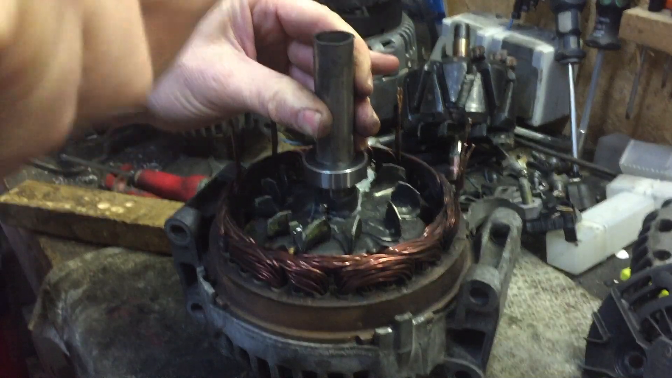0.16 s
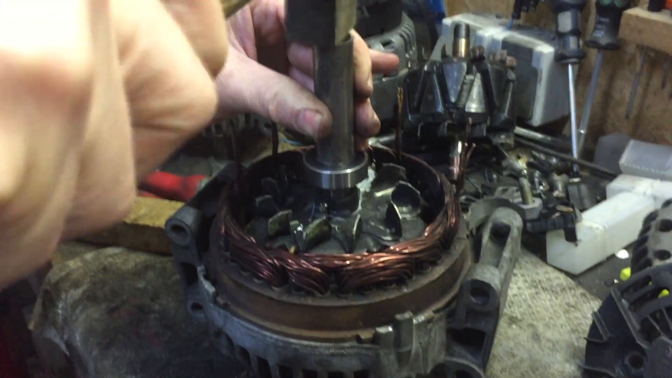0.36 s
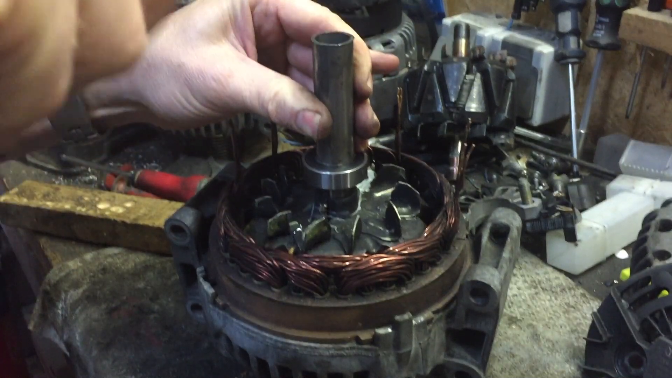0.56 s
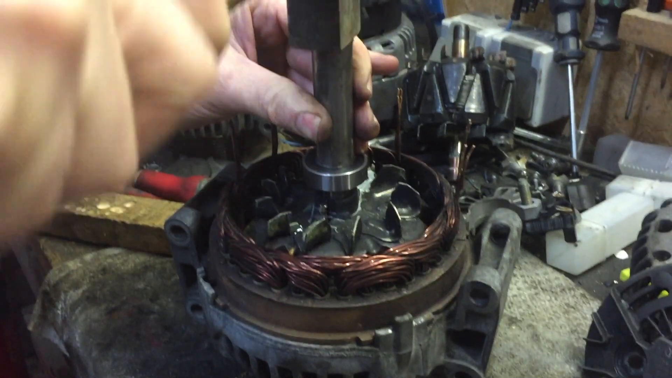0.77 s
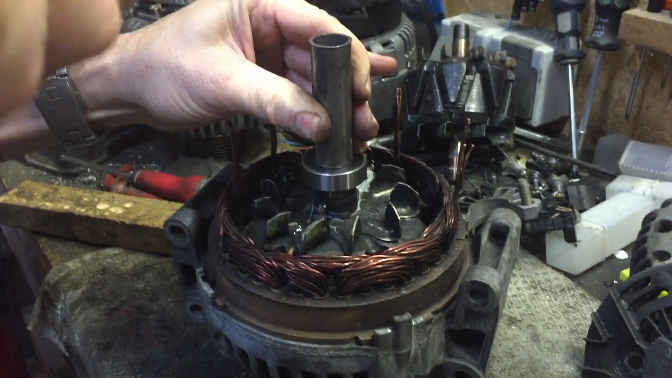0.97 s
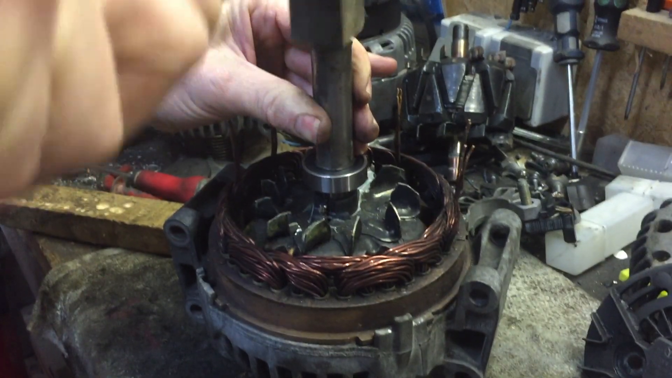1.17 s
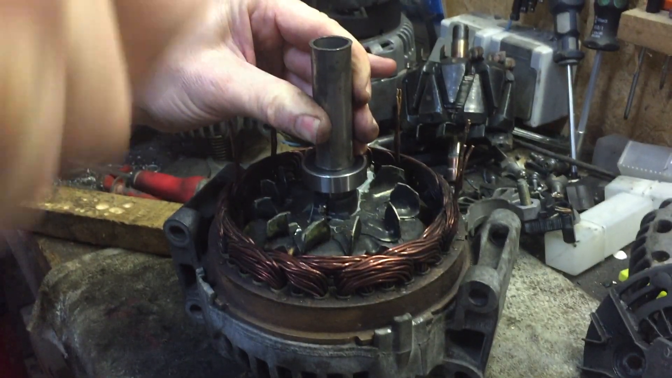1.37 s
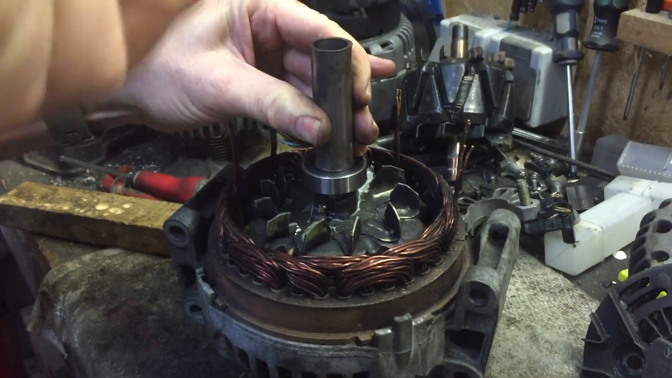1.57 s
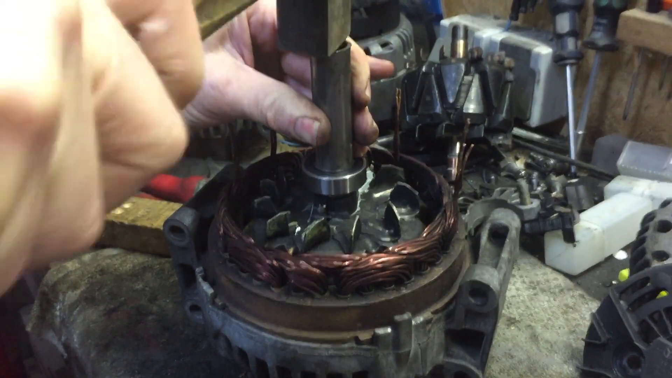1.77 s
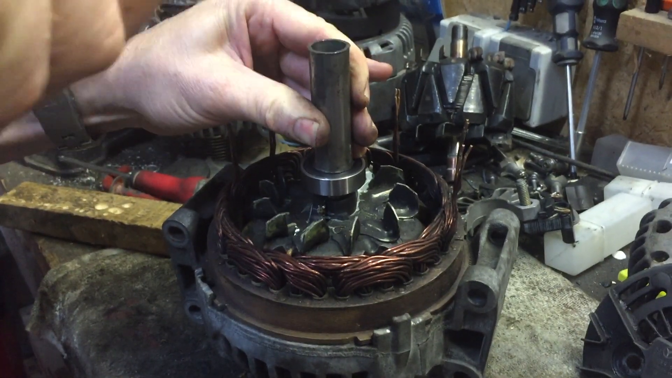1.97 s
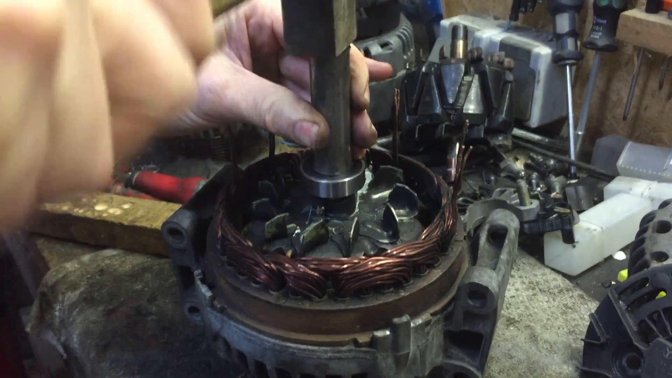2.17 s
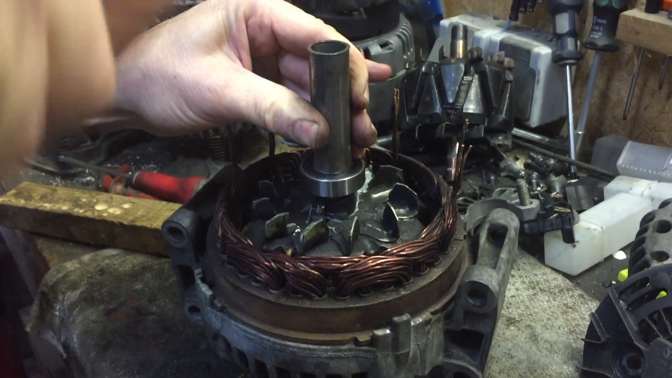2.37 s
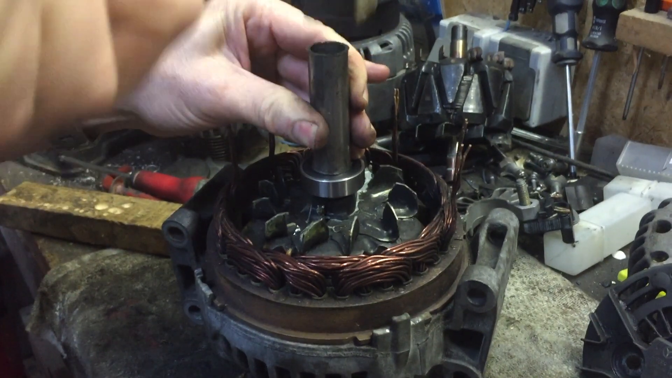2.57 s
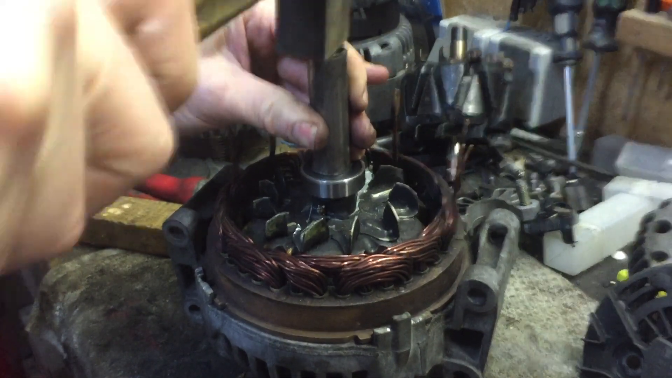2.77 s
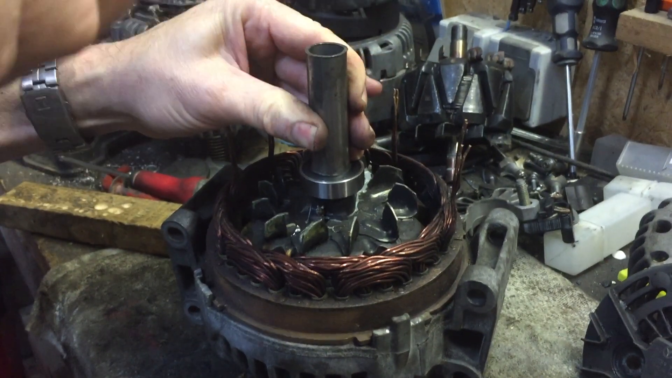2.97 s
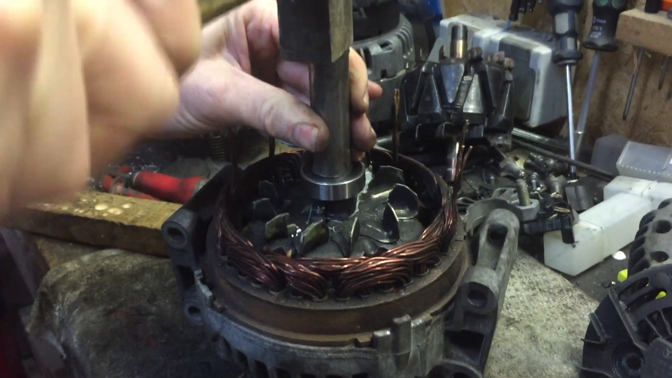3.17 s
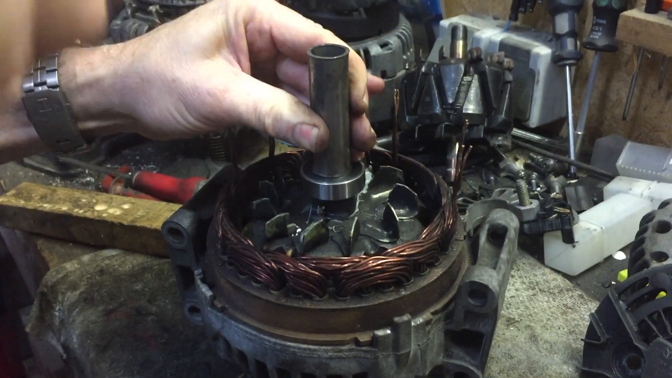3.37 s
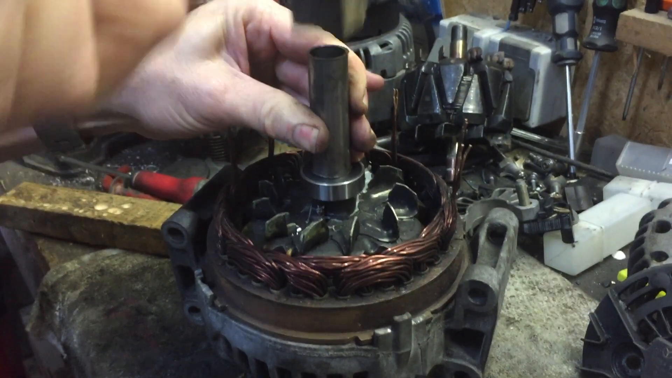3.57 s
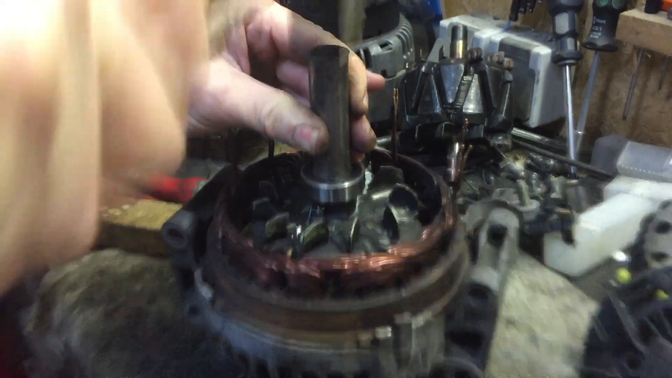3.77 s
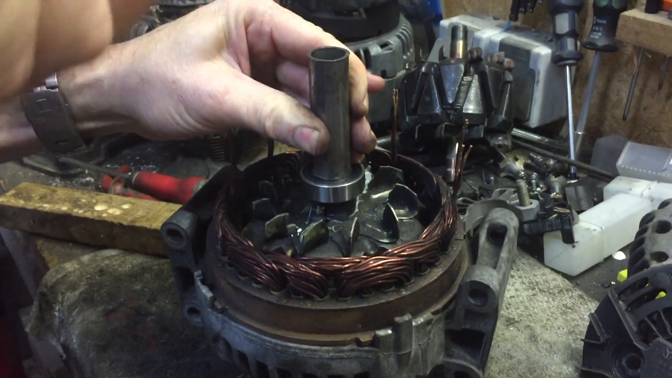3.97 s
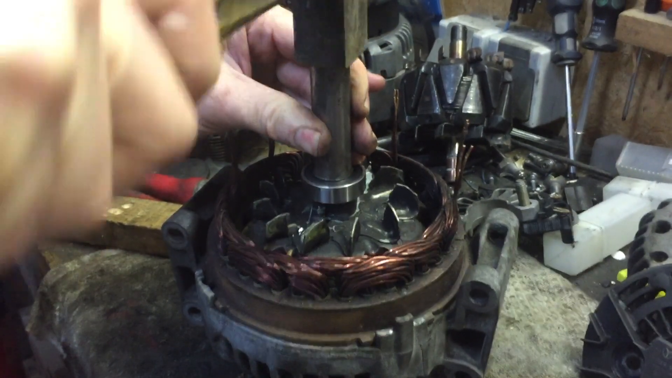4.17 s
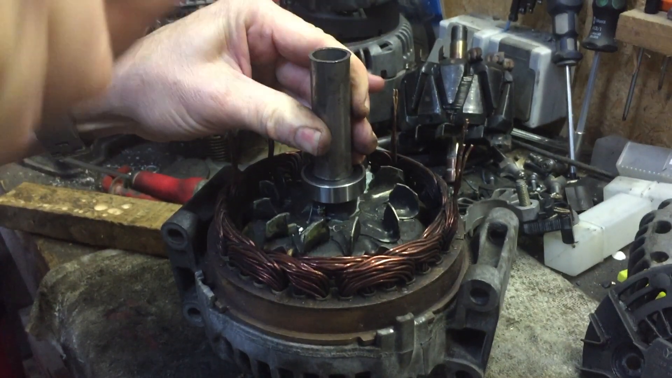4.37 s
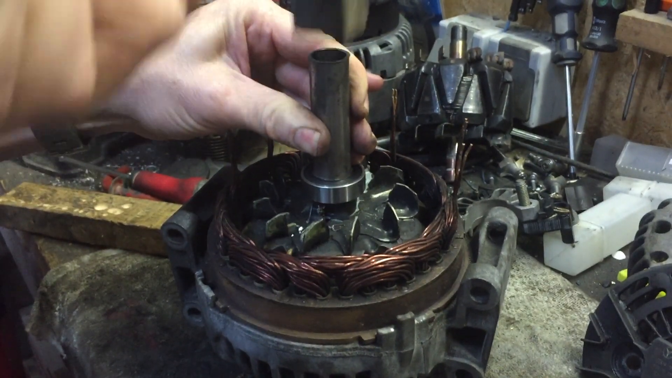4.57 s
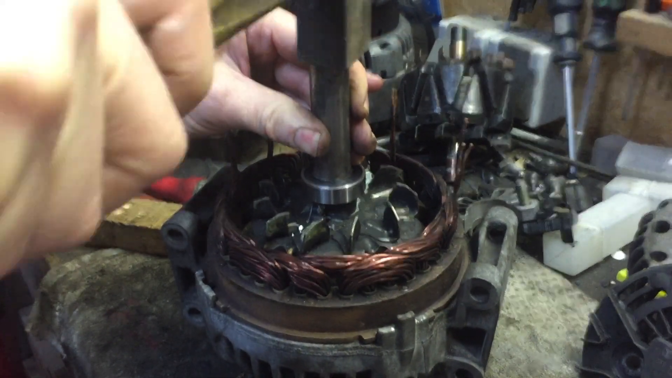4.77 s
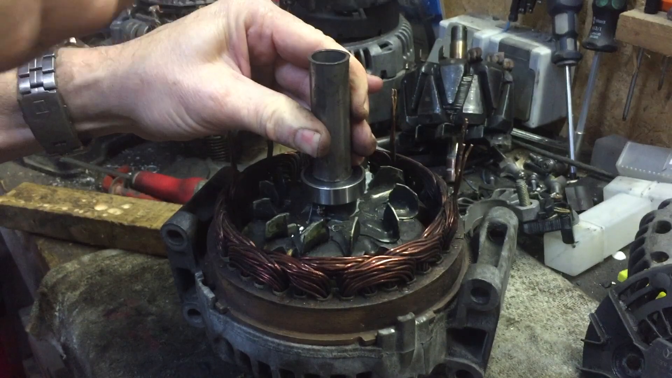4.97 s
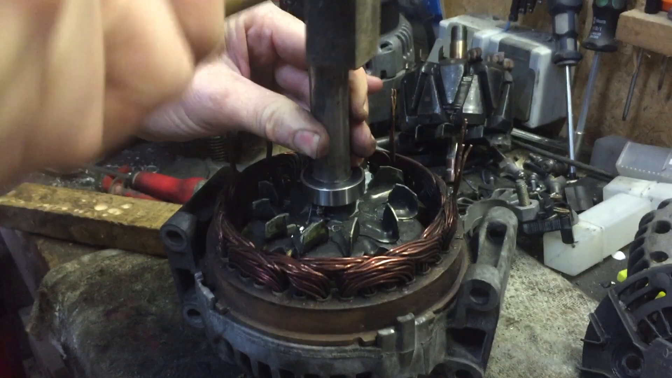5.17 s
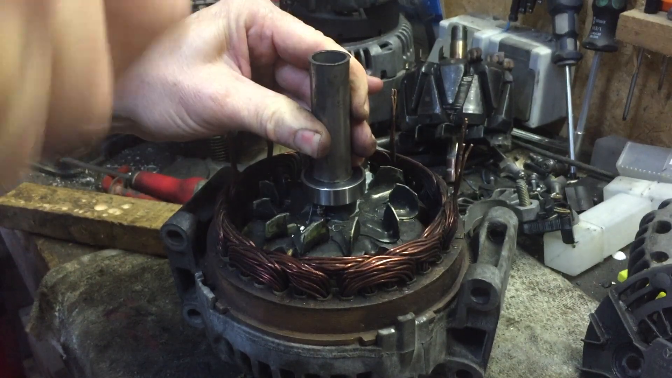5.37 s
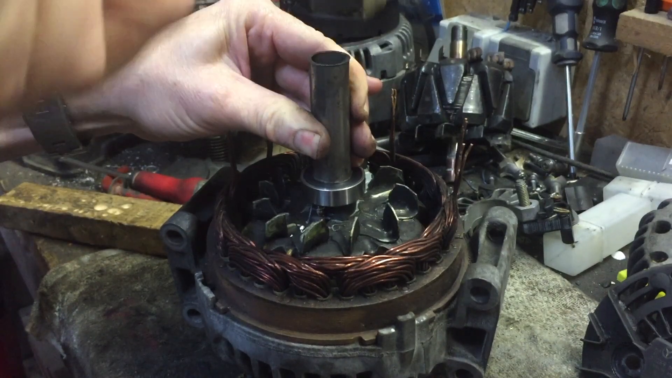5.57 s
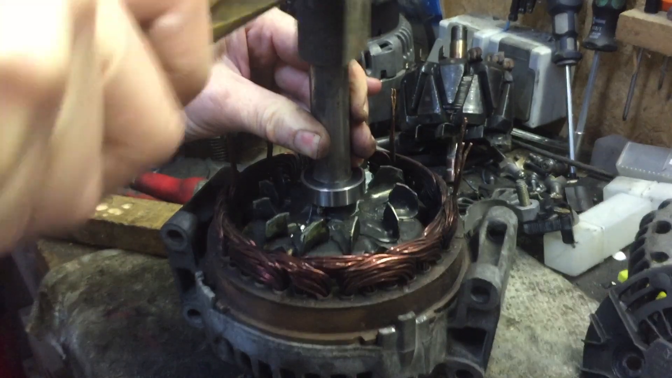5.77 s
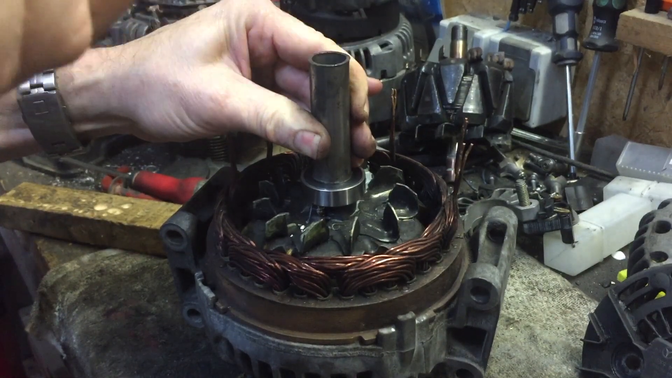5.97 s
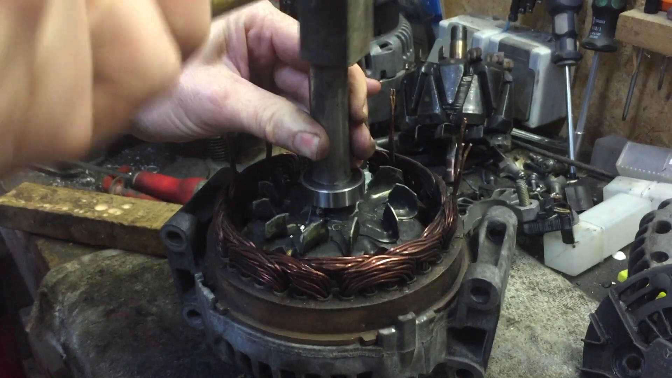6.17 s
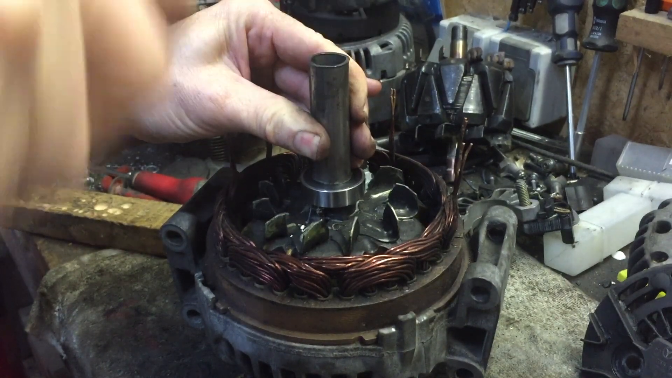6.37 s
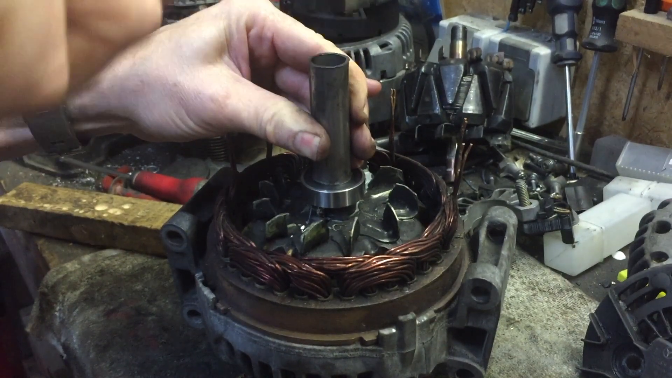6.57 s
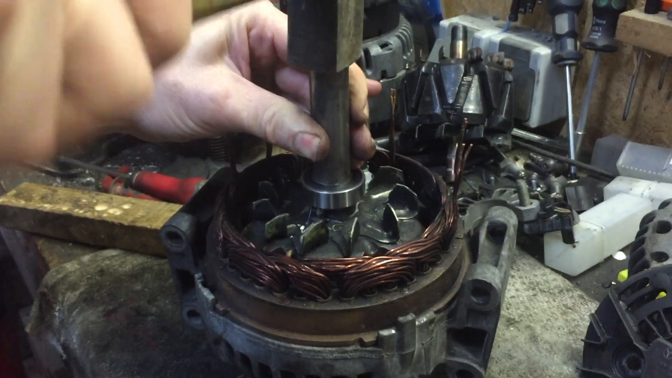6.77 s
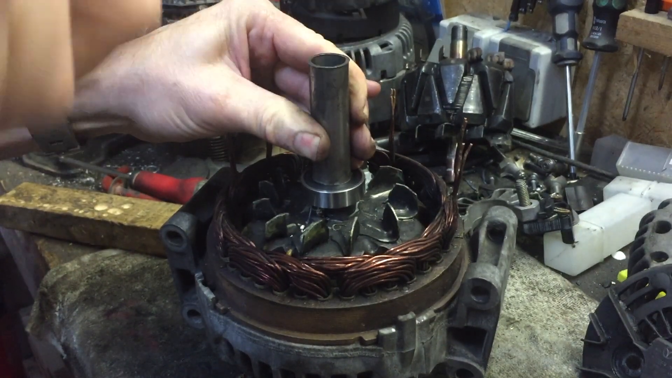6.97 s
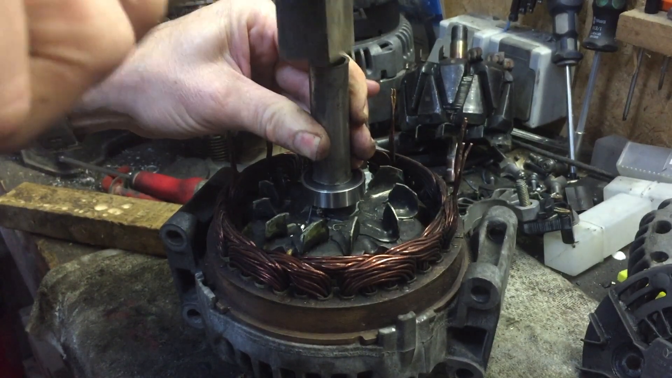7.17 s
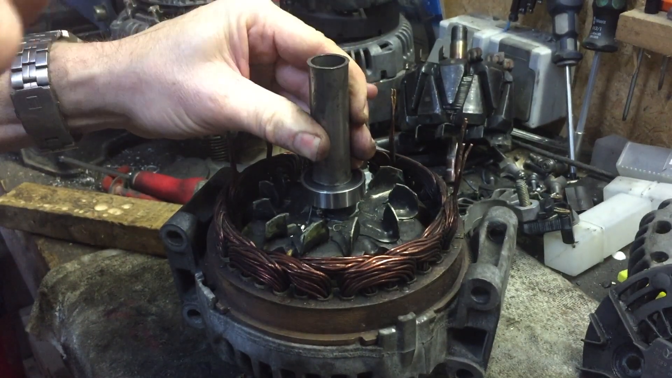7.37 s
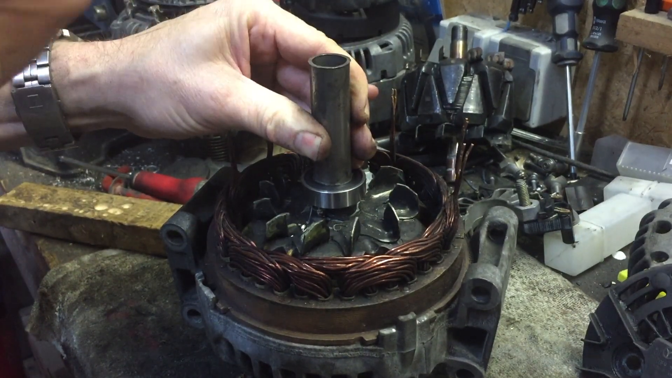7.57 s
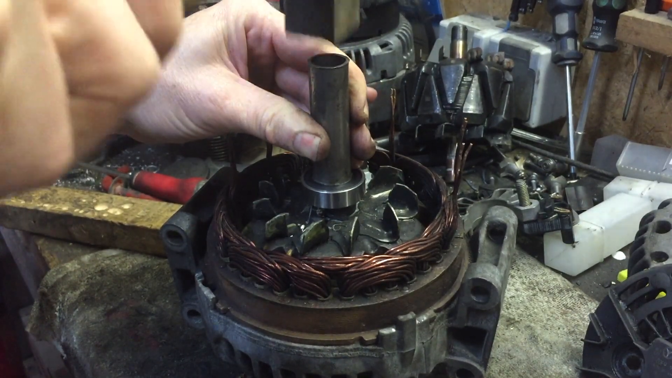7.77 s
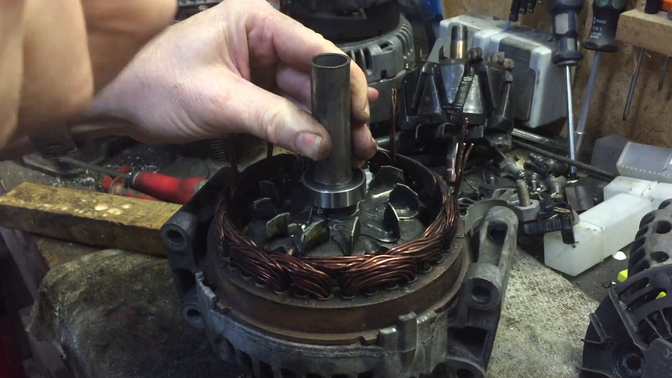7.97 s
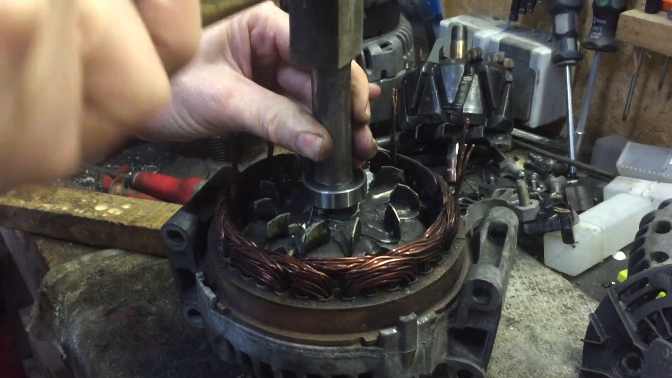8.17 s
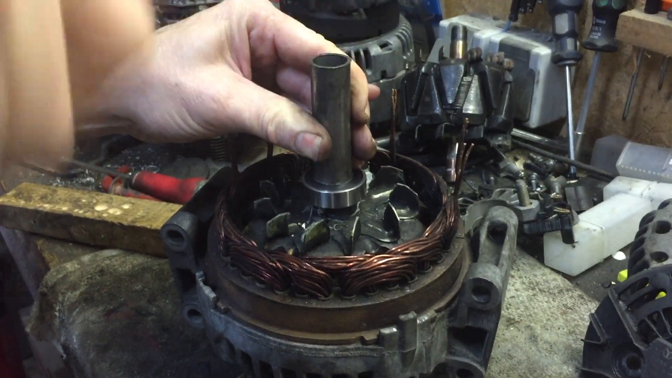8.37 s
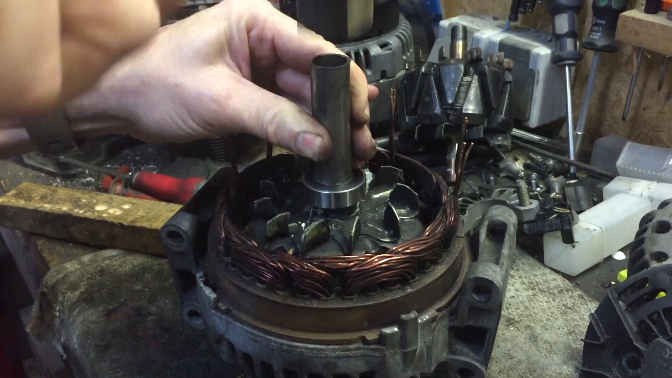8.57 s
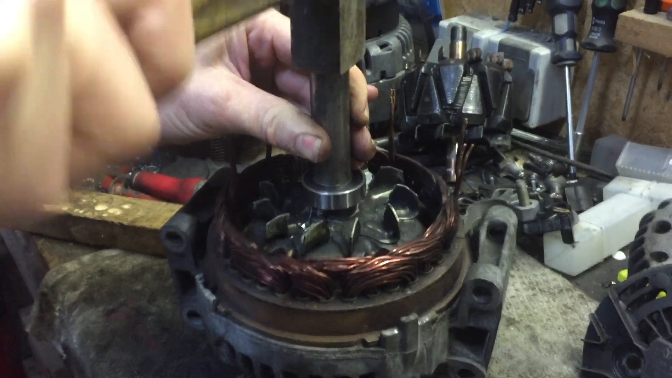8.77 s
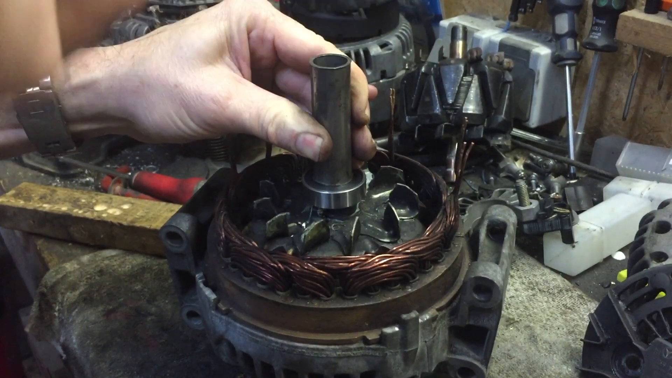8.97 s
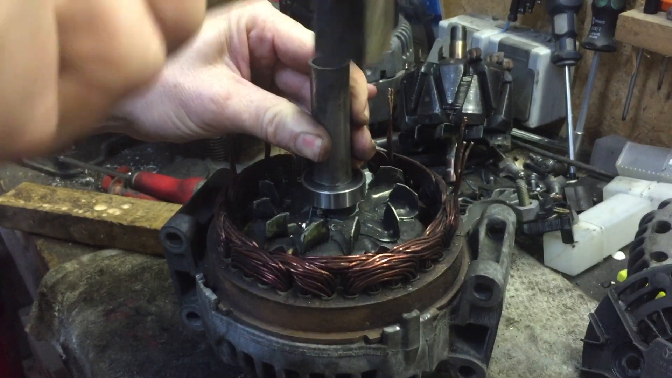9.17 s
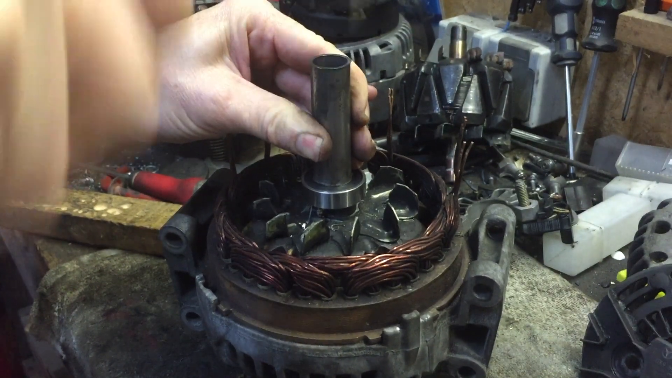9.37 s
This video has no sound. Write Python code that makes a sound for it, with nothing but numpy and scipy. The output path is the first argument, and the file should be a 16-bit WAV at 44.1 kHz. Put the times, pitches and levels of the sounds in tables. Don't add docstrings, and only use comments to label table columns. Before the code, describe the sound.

Close hammering on a steel tube over a wooden workbench in a small, fairly dry workshop. The first blow comes at 0.1 s, somewhat lighter, and blows follow evenly every third of a second, growing harder and fuller by about 2.5 s. Each is an abrupt metallic crack, slightly crushed by the overloaded microphone, with a very short bright ring, a hollow clank of the housing, a low wooden thud and a quick rattle of parts. Strength and tone change from blow to blow; brighter clangs stand out around 5.2, 5.8 and 7.1 s. Small ticks occur between some blows. After 7.1 s hammering stops; faint shop noise fades into near quiet with tiny ticks. Four blows resume at 8.2, 8.5, 8.8 and 9.1 s, the second and last followed by rapid tube chatter. Low rumble and a short room tail close it.

```python
import sys
import numpy as np
from scipy import signal
from scipy.fft import rfft, irfft
from scipy.io import wavfile

SR = 44100
rng = np.random.default_rng(int(sys.argv[2]) if len(sys.argv) > 2 else 0)


def transcribe(u):
    v = np.clip(np.atleast_2d(u).T, -1, 1)
    q = np.round(v * 32767).astype(np.int16)
    wavfile.write(sys.argv[1], SR, q)


def natural_amplitude(level_db):
    exponent = np.asarray(level_db, float) / 20
    return 10 ** exponent


N = 415422
SIZE = int(0.5 * SR)
T = np.arange(SIZE) / SR

# t/s, rumble level/dB, shop noise level/dB
FLOOR = [(0, -60, -66), (.7, -63, -62.5), (1.4, -52.5, -54), (2.3, -60.5, -56.5), (2.7, -54, -53),
         (3.602, -53.5, -53), (4.2, -62.5, -55.5), (5.499, -56, -53), (6.8, -52.5, -54.5),
         (7.402, -53.5, -56.5), (8.099, -76.5, -49.5), (8.35, -54.5, -53.5), (9.42, -43.5, -49)]
# f/Hz, density/dB per Hz
RUMBLE_SPECTRUM = [(21, -45.5), (37, -17), (54, -3.5), (65, -7), (97, -19.5), (150, -21.5), (231, -42.5),
                   (295, -33.5), (400, -49), (520, -77.5), (880, -120)]
# f/Hz, density/dB per Hz
SHOP_SPECTRUM = [(88, -35), (150, -6), (375, -1.5), (675, -14.5), (973, -12), (1150, -20), (1850, -20),
                 (2430, -18.5), (3000, -26), (4300, -24), (5000, -33.5), (7200, -29.5), (9400, -33),
                 (10500, -44), (15600, -75.5), (22000, -120)]
# f/Hz, density/dB per Hz
HISS_SPECTRUM = [(120, -30.5), (200, 0.5), (519, -1), (569, -3), (10500, -15.5), (13100, -17.5),
                 (16000, -32.5)]
# f/Hz, t60/s
ROOM_T60 = [(100, 0.18), (400, 0.5), (1500, 0.44), (5000, 0.41), (14000, 0.076)]

# t/s, force level/dB, bench thud level/dB, tube ring level/dB
BLOWS = [(0.0949, -28.5, -58.5, -33.5), (0.4512, -21.5, -17, -43.5), (0.7994, -18, -32, -22.5),
         (1.1612, -17, -30.5, -17.5), (1.5003, -15, -12.5, -22.5), (1.8459, -14.5, -15.5, -14),
         (2.1816, -16, -11.5, -28), (2.5215, -17.5, -29, -17), (2.8572, -12, -21, -9.5),
         (3.191, -12.5, -37.5, -14.5), (3.5353, -13.5, -19, -14), (3.8716, -12.5, -17.5, -21.5),
         (4.2063, -14.5, -25, -15), (4.5344, -17, -19, -19.5), (4.856, -13, -17.5, -19.5),
         (5.1786, -11.5, -16.5, -16), (5.513, -12, -14, -24.5), (5.8423, -13, -15.5, -14.5),
         (6.17, -14.5, -23, -7), (6.4998, -12.5, -27, -11), (6.8002, -16, -16.5, -20.5),
         (7.1207, -15.5, -28, -15), (8.197, -18, -29.5, -9), (8.508, -10.5, -31.5, -16),
         (8.812, -15, -31, -15), (9.1356, -12, -30.5, -19.5)]
# t/s, level/dB
TICKS = [(2.0664, -59.5), (2.0994, -55.5), (3.46, -57), (4.0714, -72), (4.4384, -56), (7.0294, -52),
         (7.4424, -58.5), (7.6994, -73), (7.8574, -63), (8.0324, -69)]
# t/s, click level/dB, ring level/dB
BOUNCES = [(8.531, -23.5, -28.5), (8.537, -17.5, -47), (8.543, -21.5, -22), (8.551, -23.5, -43.5),
           (9.1584, -25.5, -23.5), (9.1634, -22, -29)]
# t/s, f/Hz, level/dB
CLANGS = [(0.0942, 6100, -6), (1.1612, 6410, -10), (2.1812, 3190, -19.5), (2.5219, 3450, -12.5),
          (3.191, 3460, -12.5), (4.2067, 3467, -19.5), (5.1788, 3560, -6), (5.5132, 1498, -18.5),
          (5.8422, 3410, -7.5), (7.1214, 3485, -4), (8.812, 1985, -13), (9.1357, 722, -10),
          (9.1357, 3770, -14.5), (0.118, 190, -15.5), (9.1357, 2150, -15.5), (8.1972, 1880, -15),
          (6.17, 2540, -14)]

# f/Hz, level/dB, t60/s
BENCH_MODES = [(118, -4.5, 0.053), (182.9, 0, 0.21), (258, -5, 0.047)]
# f/Hz, level/dB, t60/s
HOUSING_MODES = [(340.2, -8.5, 0.098), (411.3, -3.5, 0.044), (455.1, -1.5, 0.057), (515, -0.5, 0.042),
                 (602.6, 5.5, 0.025), (719.7, -7, 0.051), (863, -1, 0.026), (987, 1.5, 0.021),
                 (1097, -11.5, 0.039)]
# f/Hz, level/dB, t60/s
ROTOR_MODES = [(1522, -2, .025), (1860, -3, .02), (2165, -1, .022), (2338, -1, .025), (2660, -3, .018),
               (2983, -2, .018), (3130, -1, .02), (3450, -1, .02), (4024, -3, .018), (7140, -5, .02)]
# f/Hz, level/dB, t60/s
TUBE_MODES = [(9000, -6.5, 0.02), (8864, 7.5, 0.013), (9300, -27.5, 0.11), (8540, -20.5, 0.12),
              (9300, -19, 0.067), (9800, -23, 0.054)]
# lowest f/Hz, highest f/Hz
CONTACT_RANGES = [
    (580, 950),
    (1900, 4200),
    (6500, 13000),
]
# f/Hz, density/dB per Hz
CRACK_SPECTRUM = [(150, -45), (470, -19.5), (800, -8.5), (3620, -6), (4440, -7), (8970, -1.5), (10500, -7),
                  (14200, -7), (15900, -12.5), (17000, -60.5)]
# f/Hz, density/dB per Hz
RATTLE_SPECTRUM = [(59, -26.5), (100, 3.5), (236, -10.5), (348, 1.5), (648, -13), (754, -5), (821, -10.5),
                   (2020, -14.5), (5930, -24.5), (8920, -25.5), (11500, -30.5), (15900, -33.5),
                   (17000, -86.5)]
# f/Hz, level/dB
HUM_BANDS = [(335, 1.5), (440, 1), (620, -4), (900, -4.5), (2300, -7.5), (3400, -19.5), (4200, -10.5),
             (5600, -13.5), (7250, -15), (8900, -22.5), (9600, -22)]
# usual level/dB, change per thud/dB/dB, per tube ring/dB/dB, per time of seating/dB/s
SHAKE = [
    (-48.5, -0.4, 0.01, 0.9),
    (-40, -0.18, 0.31, -0.18),
    (-36.5, -0.04, 0.11, 1.19),
    (-44, 0.11, 0.11, 0.8),
    (-49.5, 0.08, 0.1, -.5),
]
SHAKE_HZ = [90, 190, 600, 2500, 9000]
# f/Hz, level/dB
USUAL_SHAKE = [(90, -43.5), (190, -41), (600, -33), (2500, -41), (9000, -46.5)]


def fade(t60):
    return np.exp(-np.log(1000) * T / t60)


def swell(time_s):
    return 1 - np.exp(-T / time_s)


def shape(hz, table):
    table = np.array(table)
    return np.interp(np.log(hz + 1), np.log(table[:, 0]), table[:, 1])


def noise(table, size):
    hz = np.fft.rfftfreq(size, 1 / SR)
    x = irfft(rfft(rng.standard_normal(size)) * natural_amplitude(shape(hz, table)), size)
    return x / np.std(x)


def add(out, x, s):
    i = int(s * SR)
    out[i:i + len(x)] += x[:N - i]


def gate_db(t):
    starts = np.append(-0.33, np.array(BLOWS)[:, 0])
    since = t - starts[np.searchsorted(starts, t) - 1]
    opening = -6.5 * np.clip(1 - since / 0.15, 0, 1) - 22.5 * since
    shutting = -200 * np.clip(since - 0.31, 0, None)
    return np.maximum(opening + shutting, -48.5)


def shop():
    s, rumble_db, shop_db = np.transpose(FLOOR)
    t = np.arange(N) / SR
    waver = np.interp(t, np.arange(120) / 12, rng.standard_normal(120))
    rumble = natural_amplitude(np.interp(t, s, rumble_db) - 0.5 + 1.7 * waver) * noise(RUMBLE_SPECTRUM, N)
    voices = natural_amplitude(np.interp(t, s, shop_db) + 4 + gate_db(t)) * noise(SHOP_SPECTRUM, N)
    return rumble + voices + natural_amplitude(-77.5) * noise(HISS_SPECTRUM, N)


def room(x):
    tail = 0
    for hz in 90 * 2 ** np.arange(8):
        octave = signal.butter(2, [hz / 2 ** 0.5, hz * 2 ** 0.5], "band", fs=SR, output="sos")
        tail = tail + signal.sosfilt(octave, rng.standard_normal(SIZE)) * fade(shape(hz, ROOM_T60))
    tail *= swell(0.0021)
    return signal.fftconvolve(x, tail / np.sqrt(np.sum(tail ** 2)))[:N]


def hum(shake_db):
    hz = np.fft.rfftfreq(SIZE, 1 / SR)
    share = list(zip(SHAKE_HZ, shake_db))
    width = 0.09
    gain = 0
    for centre, db in HUM_BANDS:
        stirred_db = shape(centre, share) - shape(centre, USUAL_SHAKE)
        gain = gain + natural_amplitude(db + stirred_db) / (1 + (2 * (hz / centre - 1) / width) ** 2)
    return irfft(rfft(rng.standard_normal(SIZE)) * gain, SIZE) * fade(0.46) * swell(0.014)


def buzz(shake_db):
    share = list(zip(SHAKE_HZ, shake_db))
    colour = [(hz, db + shape(hz, share) - shape(hz, USUAL_SHAKE)) for hz, db in RATTLE_SPECTRUM]
    power = sum(natural_amplitude(db) ** 2 for db in shake_db)
    decay = fade(0.063) + natural_amplitude(-14) * fade(0.31)
    return power ** 0.5 * noise(colour, SIZE) * decay * swell(0.0083)


def clang(hz):
    pitch, phase = rng.standard_normal((2, 4, 1))
    modes = np.sin(2 * np.pi * hz * (1 + 0.03 * pitch) * T + 2 * phase)
    return np.sum(modes, axis=0) / 2 * fade(0.022 * (3500 / hz) ** 0.5)


def thud():
    hz = 58 + 345 * np.exp(-T / 0.0038)
    rise = np.clip(T / 0.0034, 0, 1) ** 1.6
    bend = rise * fade(0.073) * np.sin(2 * np.pi * np.cumsum(hz) / SR)
    sway = natural_amplitude(8.5) * fade(0.019) * np.sin(2 * np.pi * 40 * T + 3) * swell(0.013)
    return bend + sway


def ring(modes, scatter_db, detune):
    out = 0
    for (hz, db, t60), (a, b) in zip(modes, rng.standard_normal((len(modes), 2))):
        mode = np.sin(2 * np.pi * hz * (1 + detune * b) * T)
        out = out + natural_amplitude(db + scatter_db * a) * fade(t60) * mode
    return out


def sing():
    hz = np.fft.rfftfreq(SIZE, 1 / SR)
    resonance = 1 / (1 + (2 * (hz - 8790) / 300) ** 2)
    x = irfft(rfft(rng.standard_normal(SIZE)) * resonance, SIZE)
    return x / np.std(x) * fade(0.34) * swell(0.005)


def contact_rings(spot, housing_db, rotor_db, crack_db):
    low, middle, high = (fade(t60) * np.sin(2 * np.pi * hz * T) for hz, t60 in zip(spot, [0.045, 0.018, 0.012]))
    return natural_amplitude(housing_db + 3) * low + natural_amplitude(rotor_db + 3.5) * middle + natural_amplitude(crack_db - 3.5) * high


def burst(table, envelope):
    x = noise(table, SIZE) * envelope
    spectrum = rfft(x)
    even = spectrum / np.abs(spectrum) * natural_amplitude(shape(np.fft.rfftfreq(SIZE, 1 / SR), table))
    y = irfft(even, SIZE) * np.sqrt(envelope)
    return y * np.std(x) / np.std(y)


def blow(out, s, force_db, thud_db, tube_db, spot):
    extra_force_db = force_db + 14
    crack_db = -2.5 + 0.58 * extra_force_db
    rotor_db = -16 + 0.43 * extra_force_db + 4.5 * min(s - 2.4, 0)
    cause = [1, max(thud_db + 22, -13), tube_db + 18, s - 4.7]
    shake_db = np.array(SHAKE) @ cause

    crack = natural_amplitude(crack_db) * burst(CRACK_SPECTRUM, fade(0.0094) + natural_amplitude(-7.5) * fade(0.061))
    housing = natural_amplitude(force_db + 9.5) * ring(HOUSING_MODES, scatter_db=0.8, detune=0.014) * swell(0.0026)
    bench = natural_amplitude(shake_db[1] + 15) * ring(BENCH_MODES, scatter_db=0, detune=0.005) * swell(0.0057)
    rotor = natural_amplitude(rotor_db + 2) * ring(ROTOR_MODES, scatter_db=5.5, detune=0.008)
    tube = natural_amplitude(tube_db + 2.5) * ring(TUBE_MODES, scatter_db=5, detune=0.0016)
    tube += natural_amplitude(-30 + 0.86 * tube_db) * sing()
    shaken = natural_amplitude(22) * buzz(shake_db) + natural_amplitude(-22) * hum(shake_db)
    contact = contact_rings(spot, force_db - 1, rotor_db - 12.5, crack_db - 1.5)

    onset = s - 0.0002
    add(out, crack + bench + housing + rotor + tube + shaken + contact, onset)
    add(out, natural_amplitude(thud_db + 15) * thud(), onset - 0.0021)


def hammer():
    out = np.zeros(N)
    low, high = np.transpose(CONTACT_RANGES)
    spots = low * (high / low) ** rng.random((len(BLOWS), 3))
    for (s, force_db, thud_db, tube_db), spot in zip(BLOWS, spots):
        blow(out, s, force_db, thud_db, tube_db, spot)
    for s, click_db, ring_db in BOUNCES:
        scrape = noise(CRACK_SPECTRUM, SIZE) + natural_amplitude(-4) * noise(RATTLE_SPECTRUM, SIZE)
        click = natural_amplitude(click_db) * scrape * fade(0.026)
        tube = natural_amplitude(ring_db) * ring(TUBE_MODES, scatter_db=1.5, detune=0.001) * fade(0.06)
        add(out, click + tube, s)
    for s, hz, db in CLANGS:
        add(out, natural_amplitude(db) * clang(hz), s)
    for s, db in TICKS:
        add(out, natural_amplitude(db + 3.5) * noise(CRACK_SPECTRUM, SIZE) * fade(0.0053), s)
    return out


def scene():
    blows = hammer()
    return (blows + natural_amplitude(-26.5) * room(blows) + shop())[None]


def roll_off(x):
    return signal.sosfilt(signal.butter(12, 17140, fs=SR, output="sos"), x)


def record(dry):
    top = 0.56
    x = dry / (1 + np.abs(dry / top) ** 4) ** 0.25
    sharp = signal.sosfilt(signal.butter(2, 5000, "high", fs=SR, output="sos"), x)
    ghosts = natural_amplitude(-39) * (np.roll(sharp, -1024, axis=1) + 0.6 * np.roll(sharp, -512, axis=1))
    low = signal.sosfilt(signal.butter(2, 600, fs=SR, output="sos"), x)
    middle = signal.sosfilt(signal.butter(3, [2900, 3400], "band", fs=SR, output="sos"), x)
    reach = 600
    spread = rng.standard_normal((1, reach)) * np.linspace(0, 1, reach) ** 0.3
    smear = signal.fftconvolve(natural_amplitude(-47) * low + natural_amplitude(-51) * middle, spread)[:, reach - 1:]
    x = signal.sosfilt(signal.ellip(6, 0.3, 18, 15700, fs=SR, output="sos"), x + ghosts + smear)
    x = 0.85 * np.tanh(x / 0.8)
    x = signal.sosfilt(signal.ellip(8, 0.2, 60, 16900, fs=SR, output="sos"), x)
    return roll_off(x)


dry = scene()
out = record(dry)
transcribe(out)
```